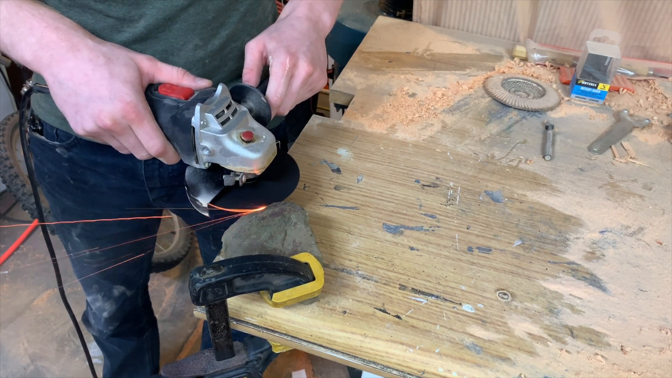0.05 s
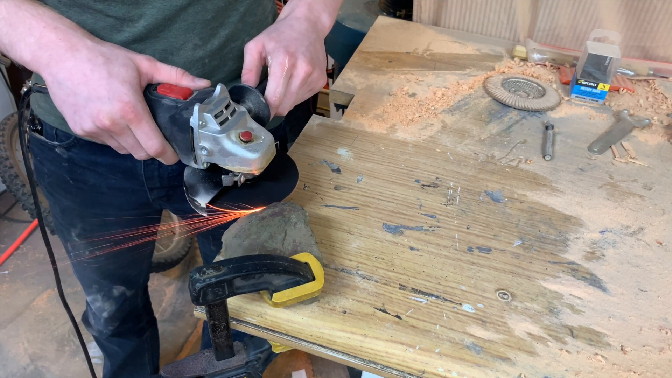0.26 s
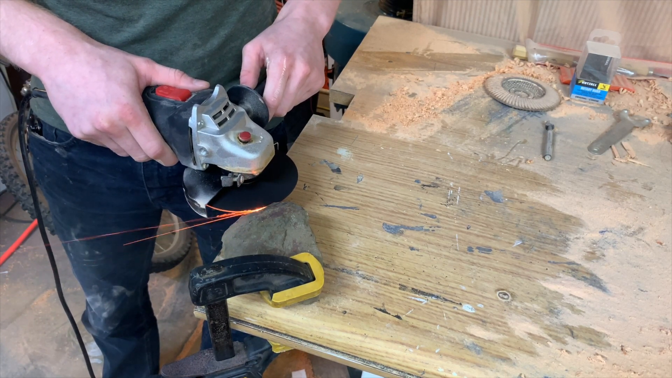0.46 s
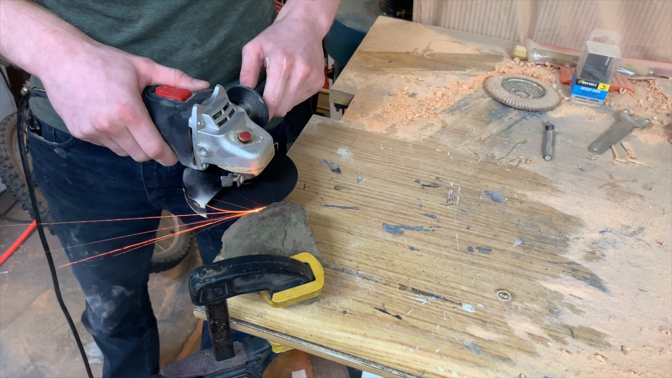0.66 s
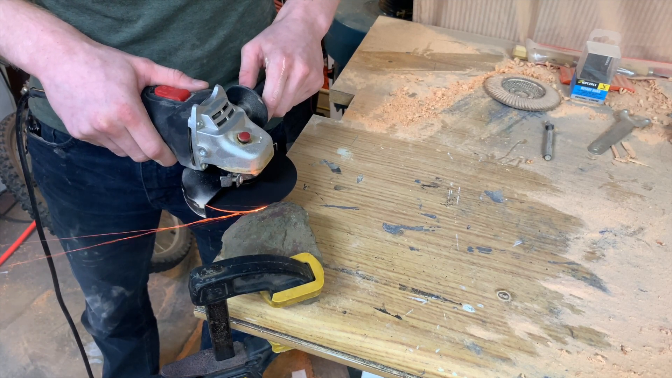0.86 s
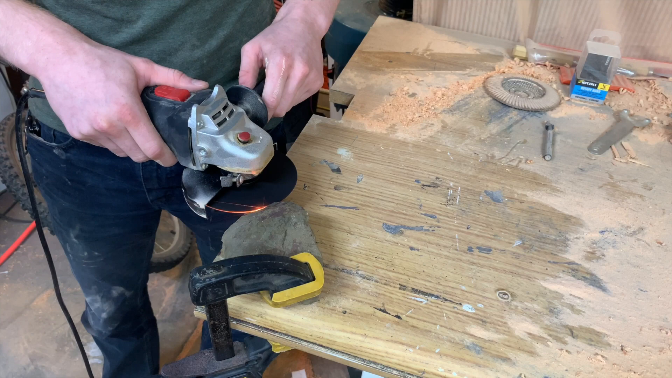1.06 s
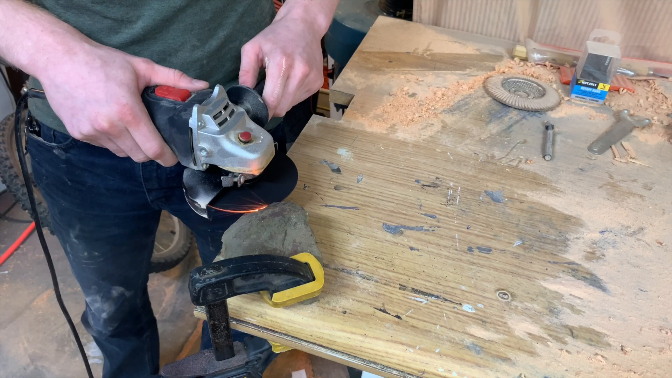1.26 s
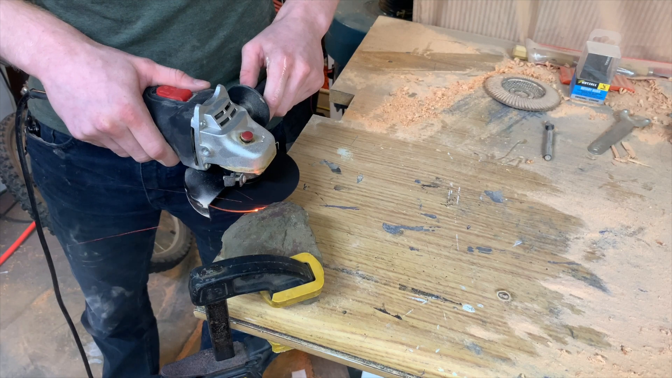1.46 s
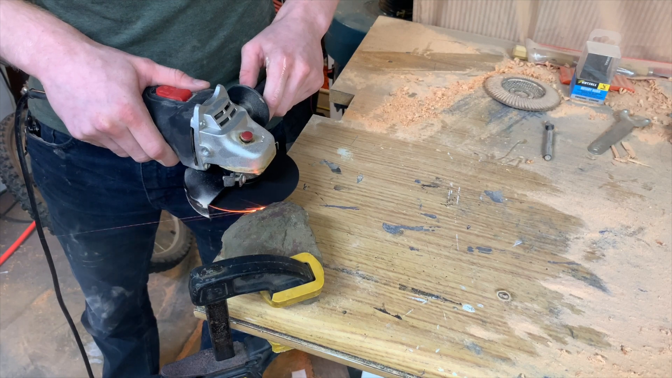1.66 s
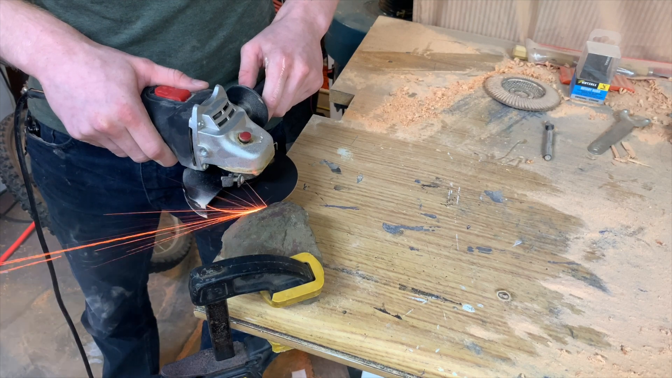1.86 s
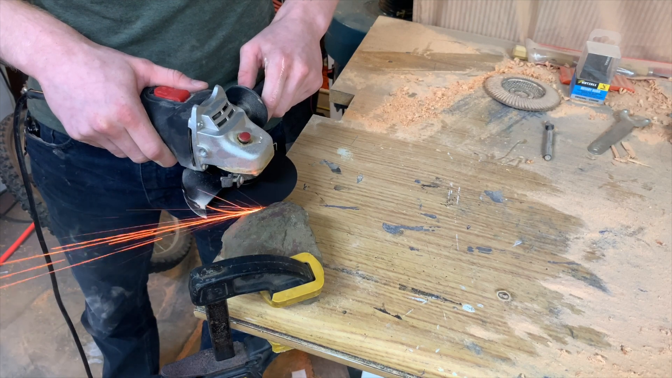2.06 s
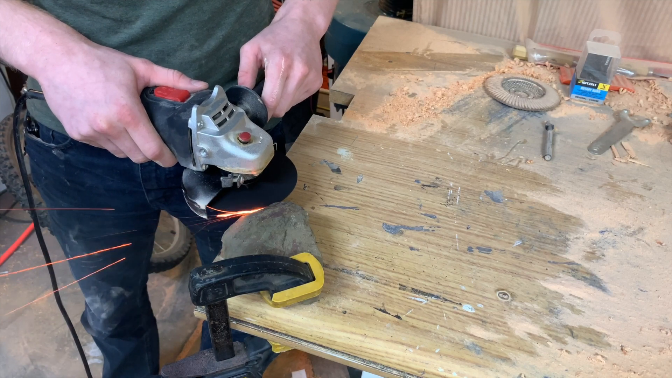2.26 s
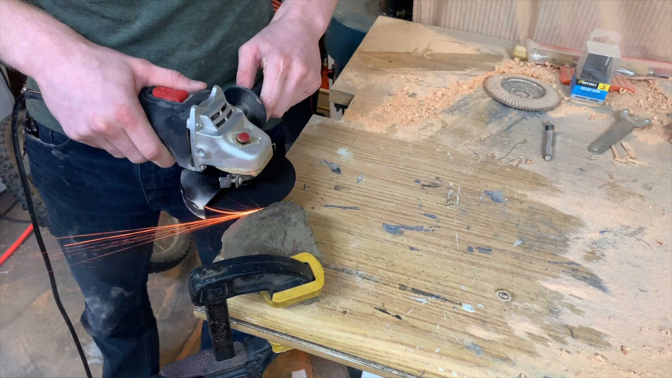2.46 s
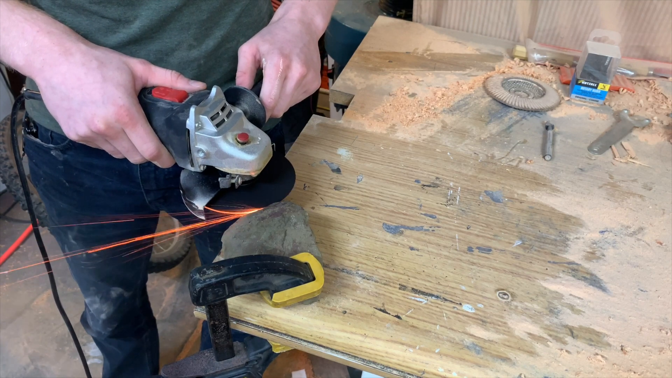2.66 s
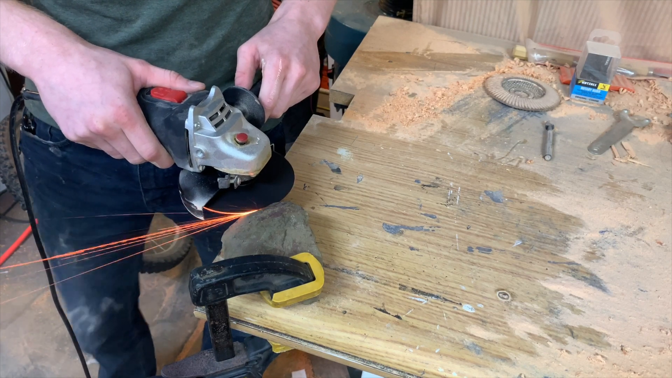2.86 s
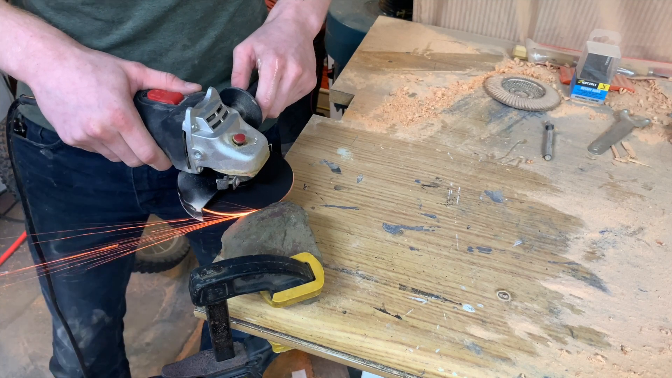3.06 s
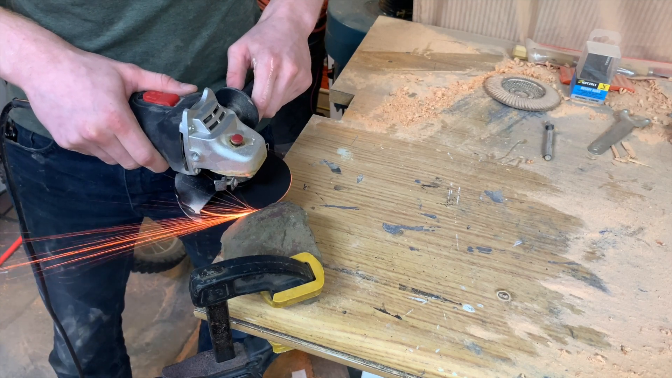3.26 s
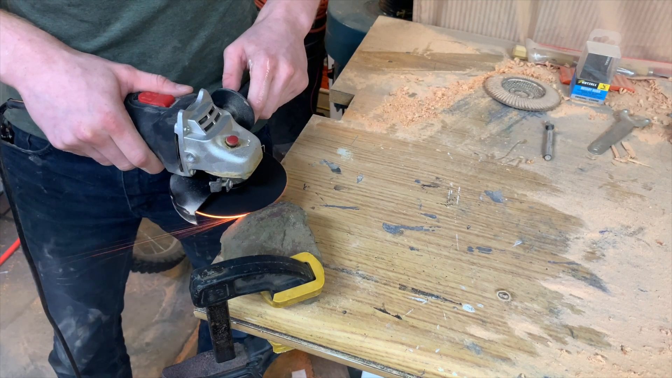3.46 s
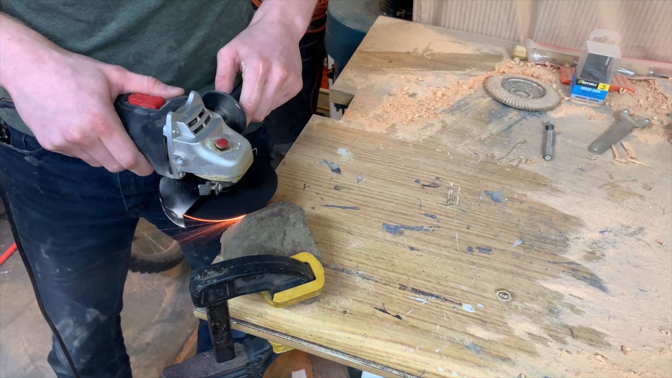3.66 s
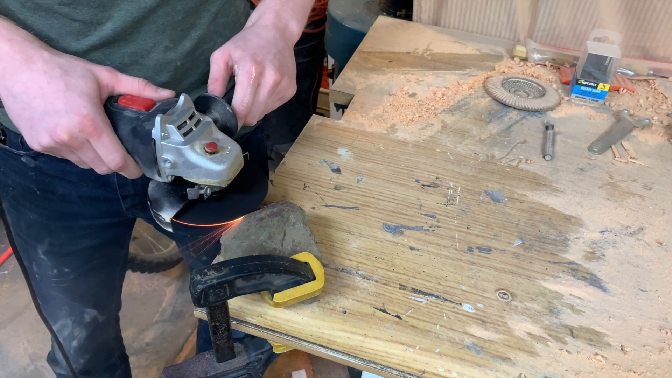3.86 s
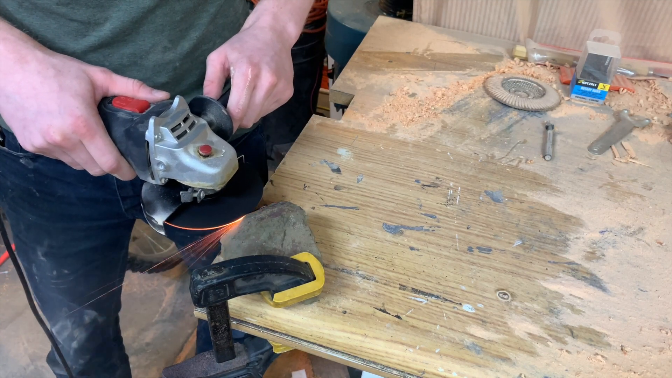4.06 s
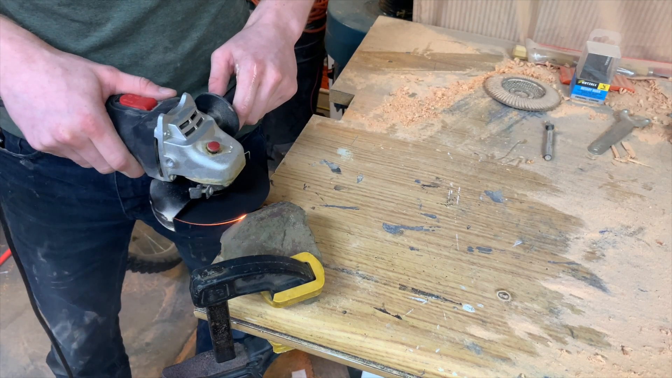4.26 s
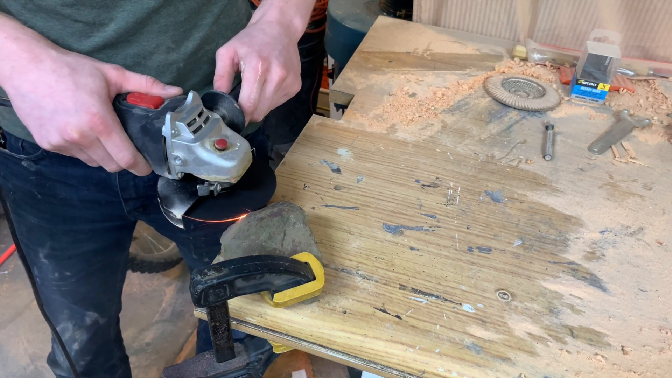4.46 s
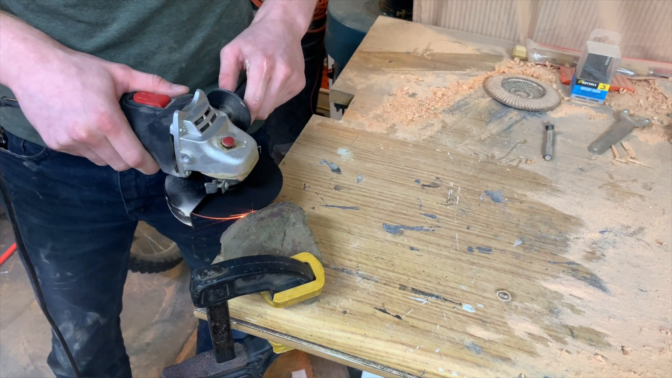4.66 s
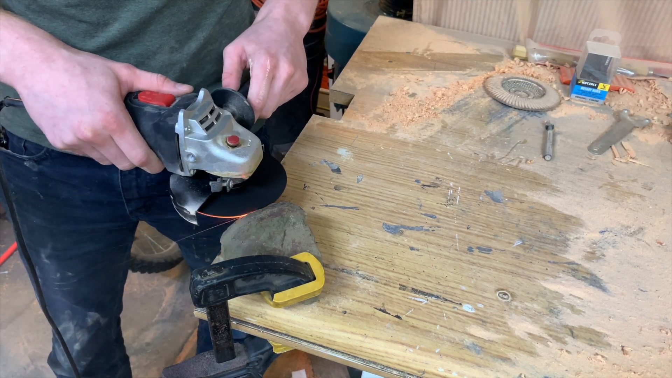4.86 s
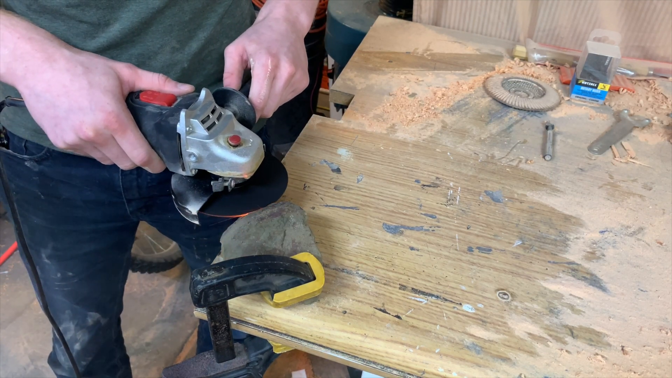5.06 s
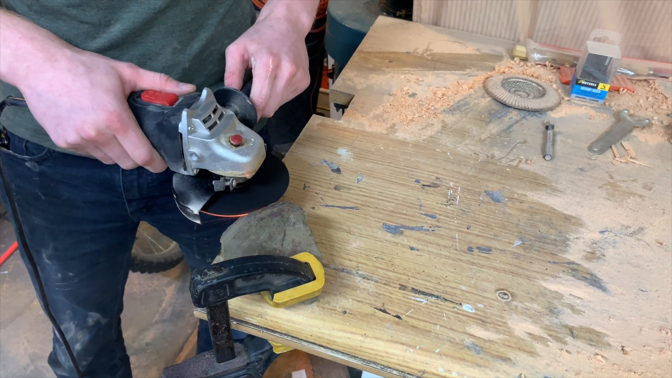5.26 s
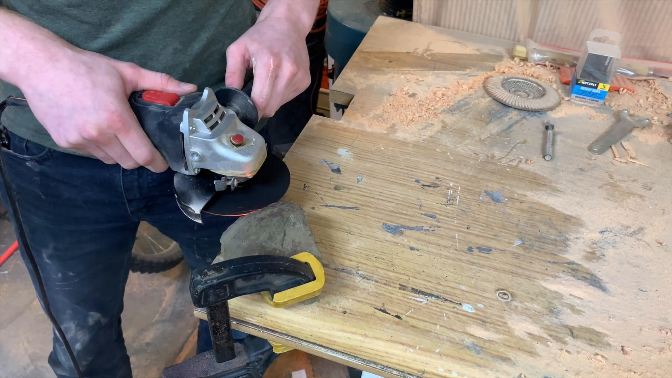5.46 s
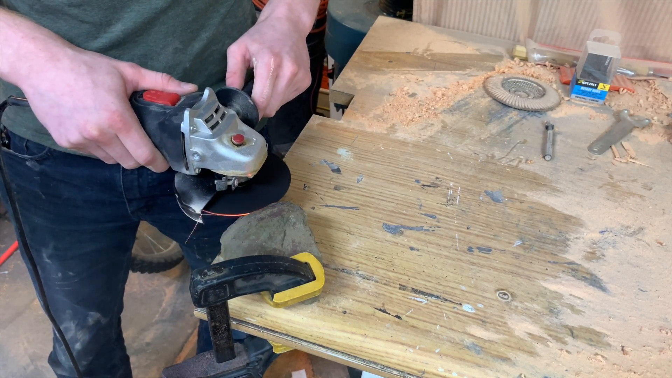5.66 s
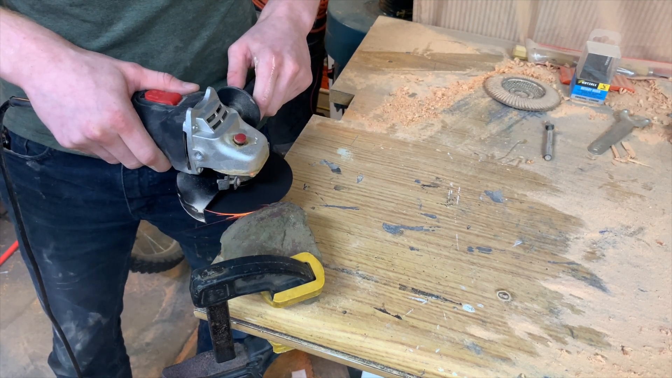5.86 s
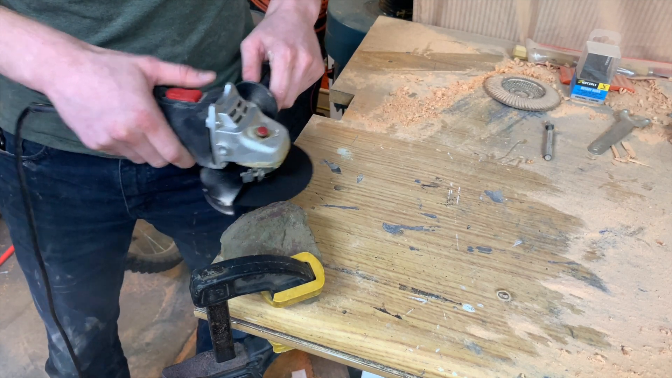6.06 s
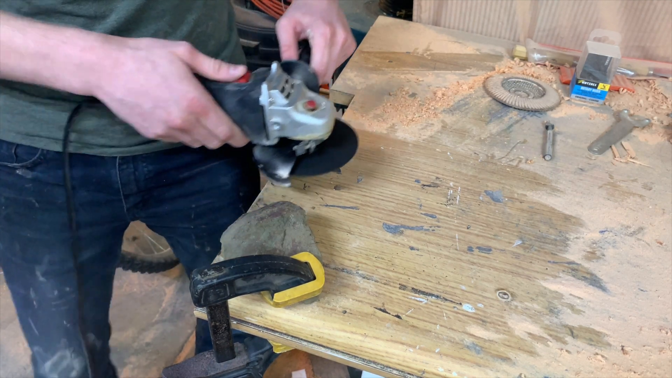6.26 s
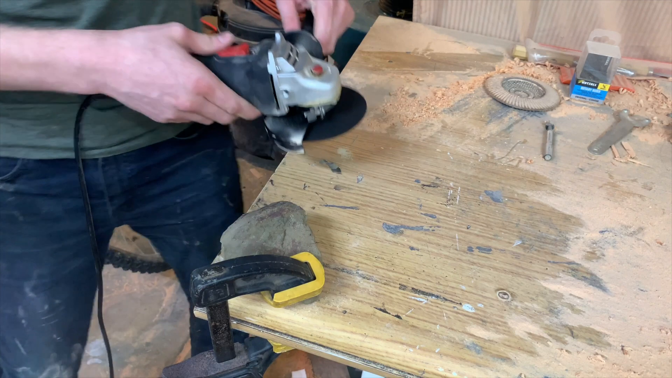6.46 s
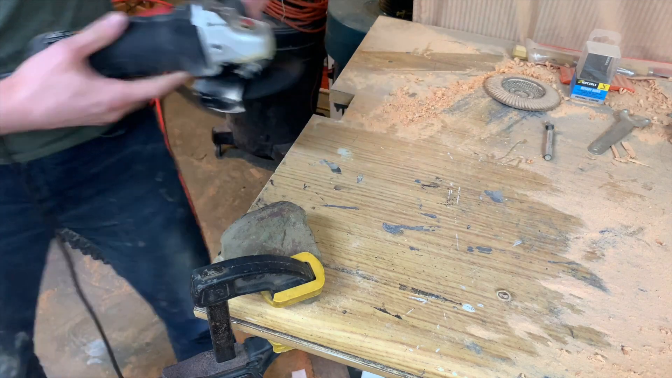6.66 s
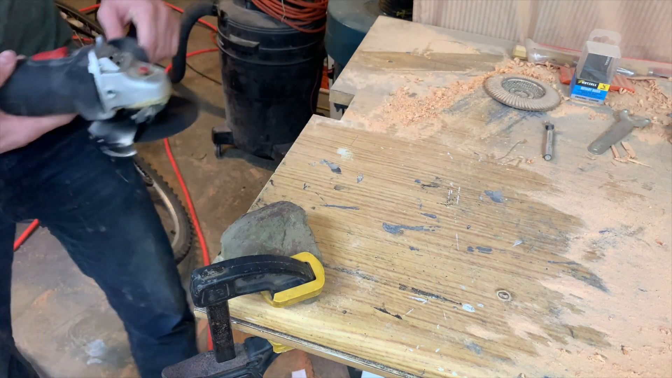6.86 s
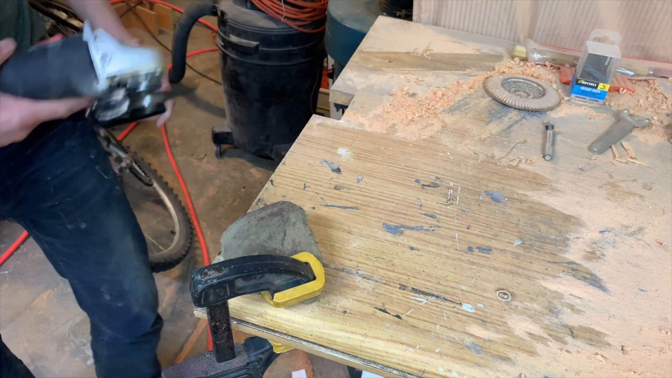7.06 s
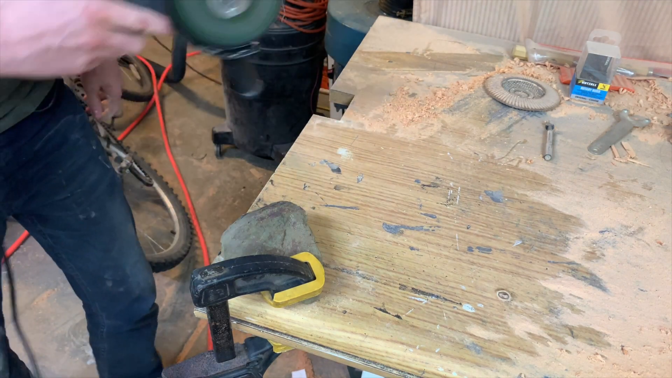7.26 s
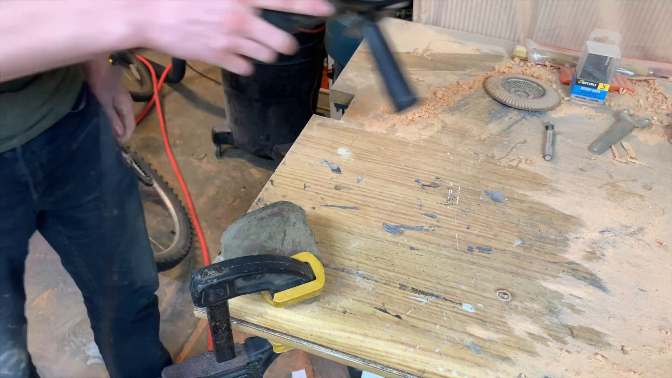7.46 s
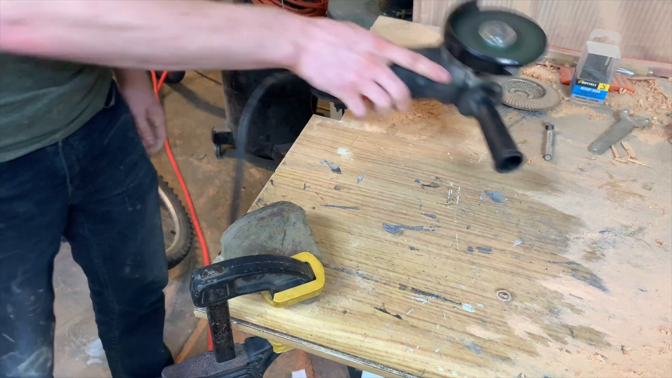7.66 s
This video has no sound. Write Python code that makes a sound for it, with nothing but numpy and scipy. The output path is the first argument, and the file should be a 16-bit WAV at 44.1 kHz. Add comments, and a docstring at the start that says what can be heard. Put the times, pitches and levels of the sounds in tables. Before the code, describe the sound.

An angle grinder scrapes hard into a rock at close range, its pitch sagging and rising, then lifts off, races briefly and coasts down rattling.

```python
"""In a workshop, an angle grinder cuts into a rock clamped to a bench, close to a pair of microphone ports.
Random grit and a rough rim scrape the stone and excite the wheel's modes; armature and gears add tones
whose pitch follows the wheel speed, which sags and rises with the pressure of the hands. The wheel lifts
off and races for a moment amid rushing air; switched off, it coasts down with its gears rattling."""
import sys
import numpy as np
from scipy import signal
from scipy.fft import rfft, irfft, next_fast_len
from scipy.io import wavfile
from scipy.ndimage import map_coordinates

SR = 44100
rng = np.random.default_rng(int(sys.argv[2]) if len(sys.argv) > 2 else 0)


def dump(signal):
    """Clip the signal to [-1, 1] and save it as 16-bit WAV at the path in sys.argv[1]."""
    limited = np.clip(np.atleast_2d(signal).T, -1, 1)
    pcm = np.round(limited * 32767).astype(np.int16)
    wavfile.write(sys.argv[1], SR, pcm)


N = 340438
T = np.arange(N) / SR
PADDED = 2 * next_fast_len(N // 2 + SR // 10, True)
HZ = np.fft.rfftfreq(PADDED, 1 / SR)


def amp(db):
    """Level definition: decibels to amplitude gain."""
    return 10 ** (np.asarray(db) / 20)


def unit(x):
    """Normalization: scales a signal to rms 1."""
    return x / np.sqrt(np.mean(x ** 2) + 1e-20)


def curves(rows):
    """Linear interpolation: each column of a table, at every sample."""
    s, *columns = np.transpose(rows)
    return [np.interp(T, s, column) for column in columns]


def swells(rows):
    """Superposition of Gaussian swells from rows of time, half length and height."""
    return sum(height * np.exp(-((T - s) / half_s) ** 2) for s, half_s, height in rows)


def spectrum(points):
    """Spectral envelope: a table joined by lines on a log-frequency axis."""
    hz, value = np.transpose(points)
    return np.interp(np.log(HZ + 1), np.log(hz + 1), value)


def bell(hz, centre_hz, width_hz):
    """Resonance curve: 1 at the centre, one half at half the width to either side."""
    return 1 / (1 + (2 * (hz - centre_hz) / width_hz) ** 2)


def modes(rows):
    """Modal response: the power gains of a few steep-sided resonances add."""
    power = sum((amp(db) / (1 + ((HZ - hz) / (0.64 * width)) ** 2)) ** 2 for hz, width, db in rows)
    return np.sqrt(power)


def colour(x, gain):
    """Minimum-phase filtering; white noise of rms 1 comes out with the gain as its density per Hz."""
    log_gain = np.log(gain + 1e-7)
    mirrored = np.r_[log_gain, log_gain[-2:0:-1]]
    phase = -signal.hilbert(mirrored).imag[:len(HZ)]
    return irfft(rfft(x, PADDED) * gain * np.exp(1j * phase))[:N] * np.sqrt(SR / 2)


def wander(rate_hz):
    """Low-pass random modulation of rms 1."""
    return unit(irfft(rfft(rng.standard_normal(PADDED)) / (1 + (HZ / rate_hz) ** 2))[:N])


def rim(turns, memory, size=256):
    """Cyclic roughness: the wheel's rough edge passes once a turn and wears a little each time."""
    fresh = rng.standard_normal((N // size, size))
    profile = signal.lfilter([1], [1, -memory], fresh, axis=0).ravel()
    return unit(map_coordinates(profile, [turns * size], order=3, mode="wrap"))


def grit(per_s, spread_db):
    """Impact noise: single grains of abrasive strike the stone, a few of them large."""
    size = amp(spread_db * np.minimum(rng.exponential(1, N), 4))
    return unit(size * rng.choice([-1, 1], N) * (rng.random(N) < per_s / SR))


def once_a_turn(turns, scatter_turns, scatter_hz):
    """Periodic excitation: an impulse each turn, with timing scatter given in turns."""
    return np.diff(np.floor(turns + scatter_turns * wander(scatter_hz)), prepend=0) > 0


# diffuse level of each band, low in a few narrow treble bands: f/Hz, level/dB of the diffuse part # against the
# direct sound for the wheel, the same for what faces away
DIFFUSE_LEVEL = [(100, -12, -9), (400, -12, -10), (1000, -4, -2), (1500, 1, 4), (2000, -2, 4),
                 (2600, -3, 2), (2950, -6, 1), (3150, -17, 1), (3420, -17, 1), (3700, 0, 2), (4400, -1, 2),
                 (5400, 3, 3), (6400, 0, 2), (7100, -15, -10), (7800, -13, -10), (9000, 0, -2),
                 (9600, -4, -6), (10150, -36, -36), (10950, -36, -36), (11400, -4, -8), (12300, -2, -1),
                 (13000, -18, -16), (14300, -16, -16), (15200, 0, 1)]
# left-right balance of the ports: f/Hz, left minus right level/dB
PORT_BALANCE = [(130, -1.5), (350, -0.5), (800, 4), (1400, 5.5), (1850, 8), (2300, 1.5), (3200, .3),
                (5200, -2.5), (7000, 0)]
# phase between the ports: f/Hz, left lead/rad
PORT_PHASE = [(100, -.15), (450, .25), (900, .05), (1800, .3), (2300, 1.4), (2750, 2.3), (3080, 3.08),
              (3480, 3.18), (4200, 3.8), (4800, 5.1), (5800, 5.5), (6800, 6.2), (8000, 6.2), (8700, 5),
              (9600, 3.8), (10100, 3.16), (11000, 3.12), (12000, 1.6), (12900, .1), (14800, -.1),
              (15600, -2.9)]
# rate at which the diffuse part changes: for the wheel, for the vents and gears [1/s]
DIFFUSE_RATE = (2, 4.5)
TAIL_T60_S = .22


def workshop(x, facing_away, diffuse_db=0, count=3):
    """Stereo diffusion: direct sound reaches two ports out of phase, with a short, changing diffuse tail."""
    wet_db = spectrum([(hz, away_db if facing_away else wheel_db) for hz, wheel_db, away_db in DIFFUSE_LEVEL])
    wet = amp(diffuse_db + wet_db)
    sides = amp(spectrum(PORT_BALANCE) * np.array([[.5], [-.5]]))
    # direct and diffuse power together keep the level of the source
    sides = sides / np.sqrt(np.mean(sides ** 2, axis=0) * (1 + wet ** 2))
    heard = rfft(x, PADDED) * np.exp(-1j * spectrum(PORT_PHASE) * np.array([[0], [1]]))
    fading = amp(-60 * T / TAIL_T60_S) * (T > .002)
    for k in range(count):
        # several random tails take turns, at constant total power
        taps = rng.standard_normal((2, N)) * fading
        taps = taps / np.linalg.norm(taps, axis=1, keepdims=True)
        share = np.sqrt(2 / count) * np.cos(np.pi * (DIFFUSE_RATE[facing_away] * T + k / count))
        heard = heard + wet * rfft(x * share, PADDED) * rfft(taps, PADDED)
    return irfft(heard * sides)[:, :N]


# wheel speed under the pressure of the hands: t/s, speed/(turns per s)
LOADED_SPEED = [(0, 126.5), (0.2, 127.6), (0.5, 131.9), (0.75, 134), (1.1, 132.2), (1.55, 125.5),
                (2.1, 123.5), (2.25, 121.9), (2.75, 120.7), (3.15, 123), (3.52, 121.8), (3.75, 132.7),
                (4.05, 143.3), (4.3, 143.9), (4.95, 131.9), (5.5, 129.1), (5.85, 132.3), (6.07, 137)]
# unloaded, the wheel races toward its free speed until the switch is released
FREE_TURNS_PER_S, RUN_UP_S, SWITCH_OFF_S = 175, .27, 6.445
# share of its speed that it then loses per second, at first, to the bearings and to the air
BEARING_LOSS_PER_S, AIR_LOSS_PER_S = .14, .235


def wheel_speed():
    """Rotor dynamics: held down by the cut, racing once free, then slowed by linear and quadratic drag."""
    loaded = curves(LOADED_SPEED)[0]
    free_s = np.maximum(np.minimum(T, SWITCH_OFF_S) - LOADED_SPEED[-1][0], 0)
    driven = FREE_TURNS_PER_S + (loaded - FREE_TURNS_PER_S) * np.exp(-free_s / RUN_UP_S)
    left = np.exp(-BEARING_LOSS_PER_S * np.maximum(T - SWITCH_OFF_S, 0))
    return driven * left / (1 + AIR_LOSS_PER_S / BEARING_LOSS_PER_S * (1 - left))


LIFT_S, RING_FADE_S, SCRAPE_FADE_S = 6.106, .042, .025


def lifted():
    """Unloading: 0 while the wheel is on the rock, 1 once it runs free."""
    return np.clip((T - LIFT_S) / RING_FADE_S, 0, 1)


# place of contact: t/s, place (0 = deep in the groove, 1 = skimming the top of the rock)
CONTACT_PLACE = [(0, 0.12), (1.2, 0.17), (1.6, 0.15), (3.45, 0.043), (3.85, 0.99), (4.4, 1), (4.9, 0.34),
                 (5.5, 0.093), (6.1, 0.64)]


def contact_place():
    """Moving point of excitation, from the groove to the top of the rock."""
    return curves(CONTACT_PLACE)[0]


# density of the rushing air before its level is set: f/Hz, relative level/dB per Hz
AIR_DENSITY = [(30, -96), (110, -81), (200, -84), (300, -73), (520, -68.5), (1050, -65.5), (1300, -60.5),
               (1700, -62.5), (2050, -62.5), (2900, -58), (3700, -58), (4300, -56), (5300, -64.5),
               (6000, -59.5), (6900, -62.5), (8600, -57), (9900, -59.5), (11400, -64), (12200, -65.5),
               (13600, -61), (15500, -76)]
# the vents swing about as the tool is carried off: t/s, change of level/dB,
# tilt/dB (the treble changes by twice the tilt, the bass by its opposite)
VENT_AIM = [(6, -38, -10), (6.13, -2.5, -1.5), (6.4, -1, -3), (6.56, -3.5, -3), (6.75, -5, -1),
            (7.05, -7, -1), (7.28, -7, -2), (7.45, -12.5, -8), (7.62, -5.5, -4), (7.72, -11, -8.5)]
# level at the reference speed, the reference speed, and slope per doubling of speed
FAN_DB, FAN_TURNS_PER_S, FAN_DB_PER_OCTAVE = -1, 220, -2
RIM_SHARE_OF_AIR = .15  # against 1 of plain noise


def fan(turns, speed):
    """Aerodynamic noise: turbulence and the passing rim, modulated at the armature's rotation."""
    aim_db, tilt_db = curves(VENT_AIM)
    level_db = FAN_DB + FAN_DB_PER_OCTAVE * np.log2(speed / FAN_TURNS_PER_S) + aim_db
    armature = 3 * 2 * np.pi * turns  # three armature turns to one of the wheel
    rush = unit(rng.standard_normal(N) + RIM_SHARE_OF_AIR * rim(turns, memory=0.91))
    air = colour(rush * amp(5.76 * np.sin(armature)), amp(spectrum(AIR_DENSITY)))
    low = irfft(rfft(air, PADDED) / (1 + (HZ / 3500) ** 2))[:N]
    return amp(level_db) * (low * amp(-tilt_db) + (air - low) * amp(2 * tilt_db))


# modes of the cutting wheel: f/Hz, width/Hz, relative level/dB per Hz in the groove, the same when skimming
WHEEL_MODES = [(1819, 21, -45, -72), (1892, 60, -40.5, -58.5), (2017, 169, -45, -46),
               (2282, 62, -43.5, -41.5), (2387, 62, -51, -50)]


def wheel_modes(skimming):
    """Modal excitation: the wheel's resonances for either place of contact."""
    return modes([(hz, width, top_db if skimming else groove_db)
                  for hz, width, groove_db, top_db in WHEEL_MODES])


# modes of the gear head: f/Hz, width/Hz, relative level/dB
GEAR_MODES = [(4200, 800, -8), (7800, 710, -2), (13200, 1700, 0.5), (13900, 600, 1)]


def ringing(blows):
    """Modal resonance: blows heard through the gear head and through the wheel, each at rms 1."""
    return unit(colour(blows, modes(GEAR_MODES))), unit(colour(blows, wheel_modes(False)))


# fits of harder rattling as the tool is tipped: t/s, half length/s, added tick level/dB, added knock level/dB
RATTLE_FITS = [(6.36, .06, -35, -40), (6.452, 0.025, -34, -44), (6.6, 0.11, -34, -56),
               (6.81, 0.035, -46, -37), (7.27, 0.038, -32, -40), (7.45, 0.072, -35.5, -32.5),
               (7.63, 0.06, -37, -28)]
# steady rattle of the slack gear teeth: their bright tick, their knock in the wheel
TICK_DB, KNOCK_DB = -42.5, -49


def rattle(turns):
    """Backlash impacts: unloaded gear teeth knock across their play, on some turns and not on others."""
    tick = amp(TICK_DB) + swells((s, half_s, amp(db)) for s, half_s, db, _ in RATTLE_FITS)
    knock = amp(KNOCK_DB) + swells((s, half_s, amp(db)) for s, half_s, _, db in RATTLE_FITS)
    strikes = once_a_turn(turns, .15, 50)
    blows = strikes * (rng.random(N) < .65) * rng.uniform(0.13, 1, N)
    decaying = signal.lfilter([1], [1, -np.exp(-1 / (0.0041 * SR))], blows)  # decay of 4.1 ms
    in_gears, in_wheel = ringing(unit(decaying * rng.standard_normal(N)))
    return lifted() * (tick * in_gears + knock * in_wheel)


# single hard clacks of the gear teeth, around switch-off and as the wheel slows:
# t/s, level/dB before the common change CLACK_DB
TOOTH_CLACKS = [(6.4288, -20), (6.453, -11), (6.8867, -24), (7.151, -17), (7.1626, -20), (7.195, -20),
                (7.219, -23), (7.2464, -21), (7.2744, -22), (7.3168, -19), (7.3597, -20), (7.4185, -26),
                (7.437, -20), (7.4644, -24), (7.5248, -23), (7.5537, -24), (7.6246, -27), (7.6924, -19)]
# common change, and level of the wheel's share against the gear head's
CLACK_DB, CLACK_KNOCK_DB, CLACK_DECAY_S = -4.5, -7, .006


def clacks():
    """Transient excitation: each hard clack sounds in the gear head and more weakly in the wheel, then decays."""
    level = sum(amp(db + CLACK_DB) * (T >= s) * np.exp(-abs(T - s) / CLACK_DECAY_S)
                for s, db in TOOTH_CLACKS)
    in_gears, in_wheel = ringing(rng.standard_normal(N))
    return level * (in_gears + amp(CLACK_KNOCK_DB) * in_wheel)


# the commutator whistles only within a band of the housing, and less while the motor drives
WHISTLE_HZ, WHISTLE_WIDTH_HZ, WHISTLE_DB, WHISTLE_DRIVEN_DB = 8450, 1350, -28.5, -6
WHISTLE_JITTER_RAD = 1.5


def whistle(turns, speed):
    """Bar-passing tone: the commutator's thin whistle, passed by a narrow band as the wheel runs free."""
    bars = 54  # cycles per wheel turn
    in_band = 1 / (1 + (2 * (bars * speed - WHISTLE_HZ) / WHISTLE_WIDTH_HZ) ** 8)
    level_db = WHISTLE_DB + np.interp(T, [LIFT_S, SWITCH_OFF_S], [WHISTLE_DRIVEN_DB, 0])
    phase = 2 * np.pi * bars * turns + WHISTLE_JITTER_RAD * wander(70)
    return lifted() * in_band * amp(level_db + 2.2 * wander(40)) * np.sin(phase)


# orders, multiples of the wheel speed: the armature turns at 3, 15 and 17 shake the wheel's modes,
# the gear teeth mesh at 37
ORDERS = (3, 4, 6, 7, 9, 10, 12, 15, 17, 31, 37)
# level/dB of each order before the resonances lift it: deep in the groove, skimming the rock,
# and running free (from the second order on; the first follows HUM_LEVEL)
GROOVE_LEVELS = (-35.5, -45.5, -52, -45.5, -52, -42, -57, -42, -45, -62, -40)
SKIM_LEVELS = (-40.5, -43.5, -35.5, -58, -52, -41.5, -52, -59, -34, -65, -39)
FREE_LEVELS = (-52, -49, -62, -52, -58, -60, -54, -62, -50, -62)
# the armature's hum fades and swells as the tool is turned and carried off: t/s, level/dB before that lift
HUM_LEVEL = [(6.2, -36), (6.34, -50), (6.42, -33), (6.51, -50), (6.57, -35), (6.75, -35), (6.88, -35.5),
             (6.93, -44), (6.98, -39), (7.05, -42), (7.19, -34.5), (7.25, -51), (7.29, -33), (7.335, -49),
             (7.39, -32.5), (7.45, -26.5), (7.6, -37), (7.72, -47)]
# resonances of the tool that lift a passing tone: f/Hz, width/Hz, lift/dB
HOUSING_MODES = [(529, 27, 7), (816, 48, 5), (900, 45, 8), (1230, 66, 11.5), (1356, 29, 11), (1815, 60, 9),
                 (4532, 100, 19.5)]
# back in the groove the tool labours, and the tones above its hum firm up: t/s, half length/s, lift/dB
LABOUR_SWELLS = [(5.3, .55, 5)]
# depth of the tones' flutter under load and running free
SHAKE_LOADED, SHAKE_FREE = 0.33, 0.24
# in the groove the wheel snags, and the tones break up: depth, rate of the random change
SNAG_DB, SNAG_HZ = 3.5, 11


def motor(turns, speed):
    """Rotational orders: tones of armature, wheel and gears, set by the contact and lifted by resonances."""
    place, free = contact_place(), lifted()
    shake = SHAKE_FREE + (SHAKE_LOADED - SHAKE_FREE) * (1 - free)
    labour_db = swells(LABOUR_SWELLS) * (1 - free)
    free_levels = [*curves(HUM_LEVEL), *FREE_LEVELS]
    tones = np.zeros(N)
    for order, groove_db, skim_db, free_db in zip(ORDERS, GROOVE_LEVELS, SKIM_LEVELS, free_levels):
        loaded_level = (1 - place) * amp(groove_db) + place * amp(skim_db)
        level = (1 - free) * loaded_level + free * amp(free_db)
        lift_db = sum(db * bell(order * speed, hz, width) for hz, width, db in HOUSING_MODES)
        if order > ORDERS[0]:
            lift_db = lift_db + labour_db
        snag_db = SNAG_DB * (1 - free) * (1 - place) * (wander(SNAG_HZ) - .5)
        flutter = 1 + shake * wander(25)
        phase = 2 * np.pi * order * turns + 2.0 * shake * wander(11.6)
        tones += level * amp(lift_db + snag_db) * flutter * np.sin(phase)
    return tones


# density of the scrape before pressure and body: f/Hz, relative level/dB per Hz
SCRAPE_DENSITY = [(30, -107), (75, -75.5), (200, -74.5), (260, -65.5), (400, -59), (720, -66.5),
                  (1080, -61), (1650, -60), (2650, -52), (2900, -54), (3150, -57.5), (3550, -57.5),
                  (4300, -55.5), (5000, -57.5), (6200, -56), (7200, -57.5), (9400, -56.5), (10600, -56.5),
                  (11200, -51.5), (11800, -51), (12600, -56.5), (13300, -54.7), (14300, -53.3),
                  (15100, -63), (15700, -63)]
# the rock, bench and guard under the scrape: f/Hz, width/Hz, lift/dB in the groove, lift/dB when skimming
BODY_MODES = [(91.5, 9.3, 3.5, 11), (193, 210, 5, -3), (411.6, 10, 2.5, 6), (667, 93, 8, -1),
              (891, 60, 10.5, 7), (1224, 61, 9.5, -2), (1433, 154, 8, 4), (3760, 130, 7.5, 4),
              (4122, 60, 3.5, 3), (4350, 130, 5, 0), (4540, 90, 5, 0), (9960, 380, 6, 9.5),
              (7150, 140, 3, 8.5), (7690, 160, 7, -0.5), (8240, 530, 5.5, 9.5), (12480, 900, -1, 3)]


def stone(skimming):
    """Forced vibration: the spectrum of the scrape, with the body's lifts for either place of contact."""
    lift_db = sum((top_db if skimming else groove_db) * bell(HZ, hz, width)
                  for hz, width, groove_db, top_db in BODY_MODES)
    return amp(spectrum(SCRAPE_DENSITY) + lift_db)


# the edge bites harder and the wheel rings up: t/s, half length/s, lift/dB,
# added strength of the once-a-turn strike
EDGE_BITES = [(0.5, 0.1, .6, .1), (1.1, 0.25, 1.3, .6), (1.62, 0.18, 1.8, 1.7), (2.72, 0.2, .6, 1.4),
              (3.75, 0.22, .6, .9), (4.68, 0.24, 1.8, 1.3), (6.07, .08, .8, .3)]
# how hard the grit scrapes: t/s, change of level/dB
GRIT_PRESSURE = [(0, 0), (.6, 0.24), (1.45, 0.5), (1.65, 0.7), (3.3, 0.4), (3.9, 1), (4.35, -0.6),
                 (4.8, 1.4), (6.1, 0.8)]
RING_DB, SCRAPE_DB = -1, -2
# the wheel's high spot strikes the stone once a turn: base strength against the grit, scatter of timing
STRIKE, STRIKE_SCATTER_TURNS = .4, .003


def cutting(turns):
    """Frictional excitation: a contact force, pulsing as the wheel wobbles, drives wheel modes and stone."""
    ring_db = RING_DB + swells((s, half_s, db) for s, half_s, db, _ in EDGE_BITES)
    strike = STRIKE + swells((s, half_s, more) for s, half_s, _, more in EDGE_BITES)
    grit_db = SCRAPE_DB + curves(GRIT_PRESSURE)[0] + 0.083 * wander(9)
    place = contact_place()
    lifted_s = np.maximum(T - LIFT_S, 0)
    angle = 2 * np.pi * turns + 0.5 * wander(1.8)
    once, twice, fourfold = (np.cos(k * angle) for k in (1, 2, 4))

    # the edge catches and skips from turn to turn
    rasp_db = 2.2 * once + 3.4 * twice + 1.9 * wander(88)
    rasp = unit((0.3 * rim(turns, memory=0.8) + 1.0 * grit(6000, spread_db=2.5)) * amp(rasp_db))
    high_spot = unit(once_a_turn(turns, STRIKE_SCATTER_TURNS, 60) * amp(3.5 * wander(60)))
    ring_force = (rasp + strike * high_spot) / np.sqrt(1 + strike ** 2)
    ring = ((1 - place) * colour(ring_force, wheel_modes(False))
            + place * colour(ring_force, wheel_modes(True)))

    scrape_db = 1.3 * once + .9 * twice + 1.2 * fourfold + 1.2 * wander(60)
    roughness = 0.53 * rim(turns, memory=0.9) + 1.27 * grit(9000, spread_db=2.4)
    scrape_force = unit(roughness * amp(scrape_db))
    scrape = (1 - place) * colour(scrape_force, stone(False)) + place * colour(scrape_force, stone(True))

    # pressed into the groove, the wheel's wobble shakes the bench
    thrum = amp(-48.5 - 6.2 * place + 0.7 * wander(13.0)) * np.sin(2 * np.pi * turns)
    ring_fade = np.exp(-lifted_s / RING_FADE_S)
    scrape_fade = 1 / (1 + (lifted_s / SCRAPE_FADE_S) ** 2)
    return amp(ring_db) * ring * ring_fade + (amp(grit_db) * scrape + thrum) * scrape_fade


def scene():
    """Superposition: one spindle drives all; vents and gear head face away and have their own stereo spread."""
    speed = wheel_speed()
    turns = np.cumsum(speed * (1 + .002 * wander(10))) / SR
    away = workshop(fan(turns, speed) + rattle(turns) + clacks(), facing_away=True)
    # the tones reach the ports more directly than the noise
    tones = workshop(motor(turns, speed) + whistle(turns, speed), facing_away=False, diffuse_db=-6)
    return away + tones + workshop(cutting(turns), facing_away=False)


EDGE_HZ = 15800


def record(dry):
    """Clipping and band limitation: full-scale limit, then a linear-phase low-pass."""
    lowpass = signal.firwin(511, EDGE_HZ, window=("kaiser", 9), fs=SR)
    return signal.oaconvolve(np.clip(dry, -1, 1), lowpass[None], "same")


dry = scene()
out = record(dry)
dump(out)
```